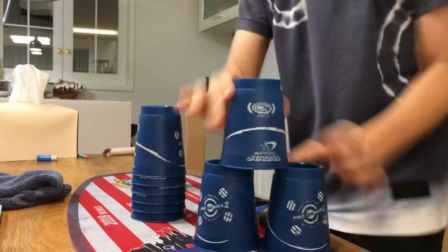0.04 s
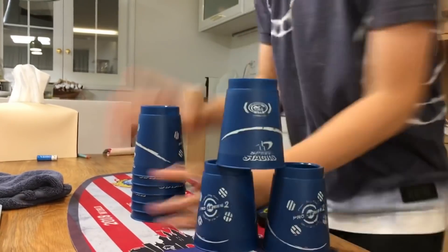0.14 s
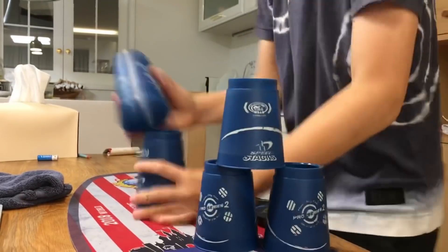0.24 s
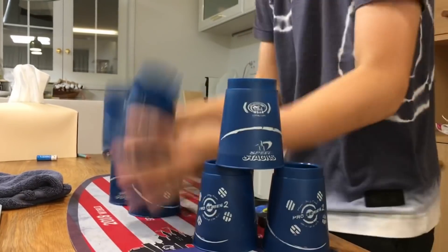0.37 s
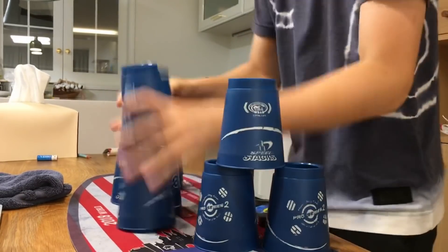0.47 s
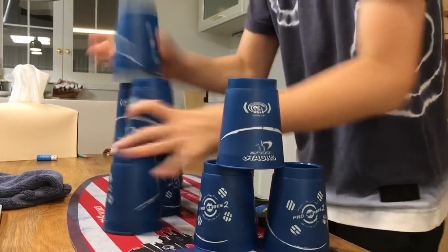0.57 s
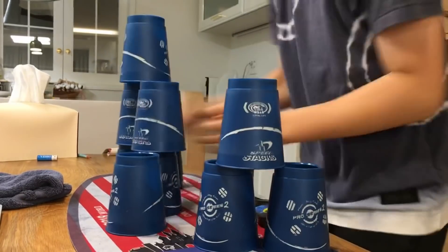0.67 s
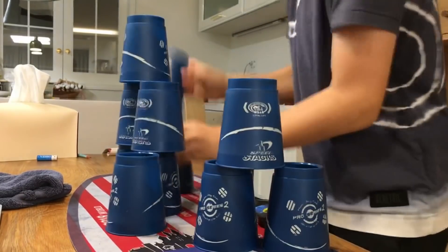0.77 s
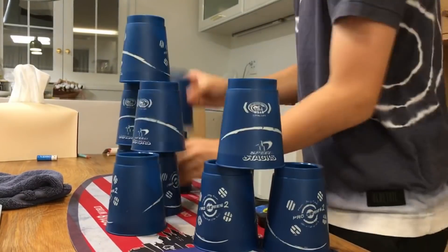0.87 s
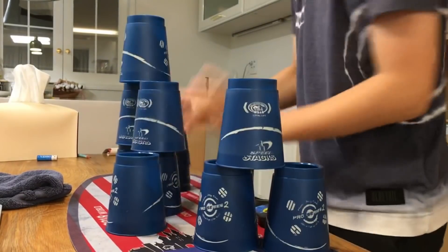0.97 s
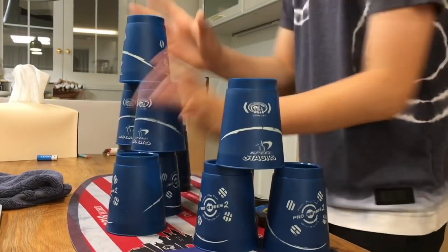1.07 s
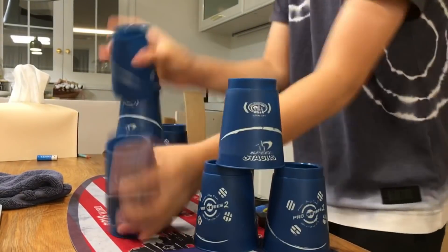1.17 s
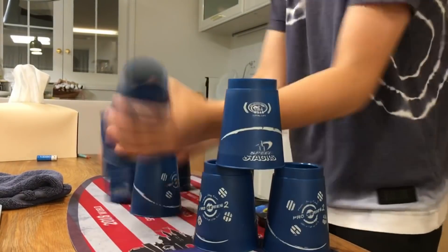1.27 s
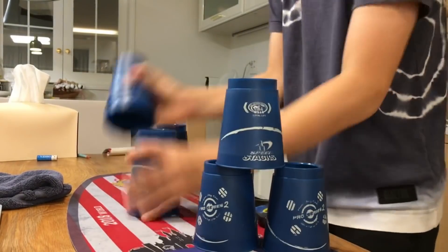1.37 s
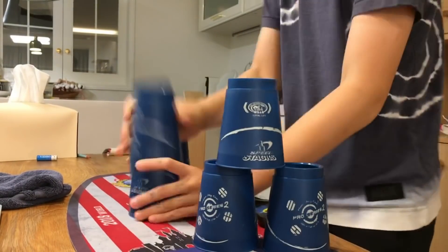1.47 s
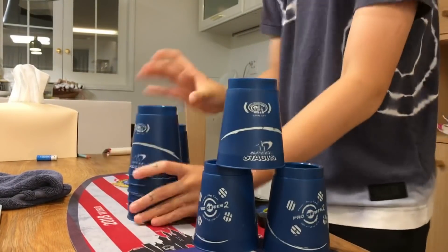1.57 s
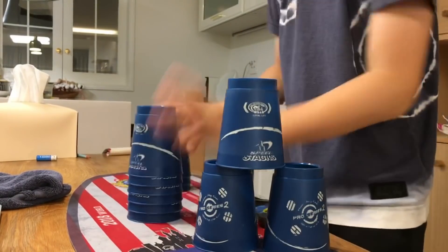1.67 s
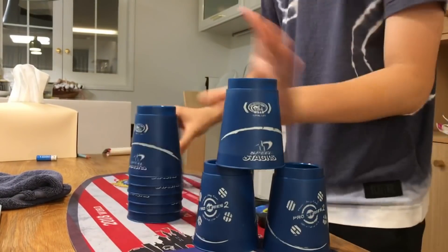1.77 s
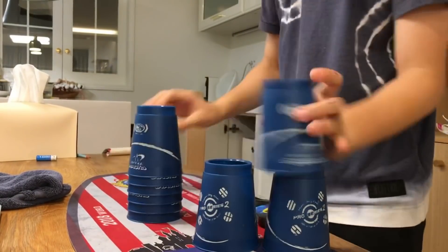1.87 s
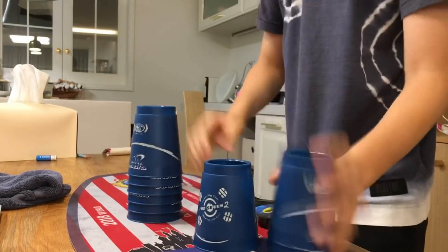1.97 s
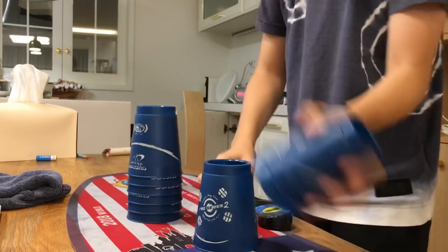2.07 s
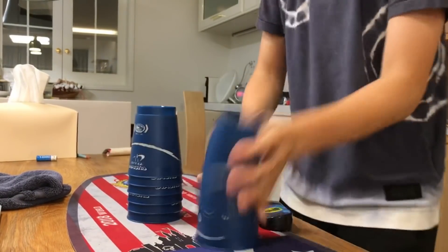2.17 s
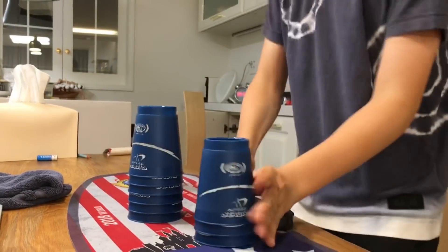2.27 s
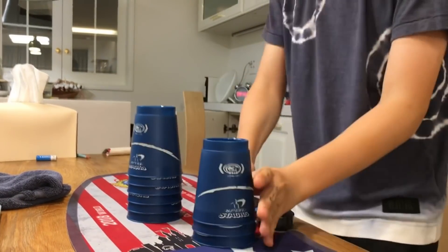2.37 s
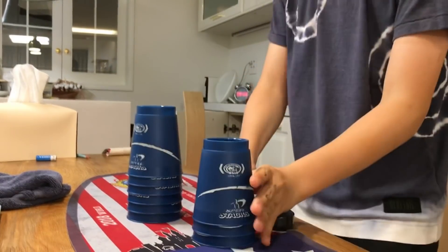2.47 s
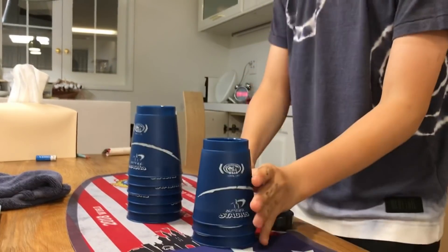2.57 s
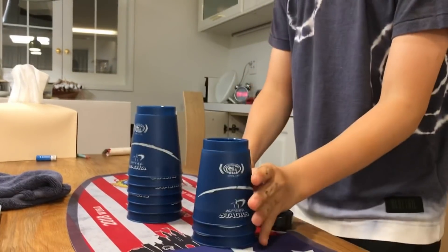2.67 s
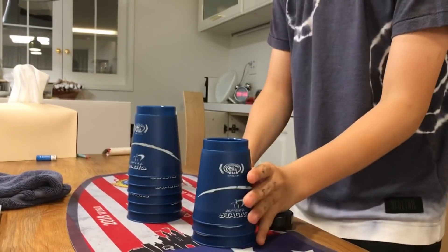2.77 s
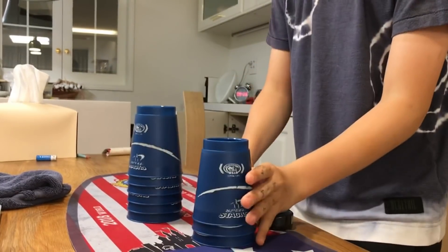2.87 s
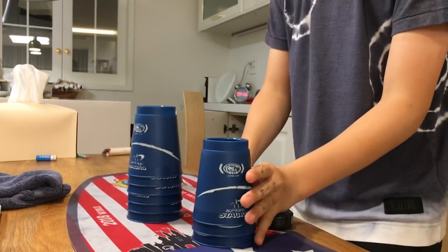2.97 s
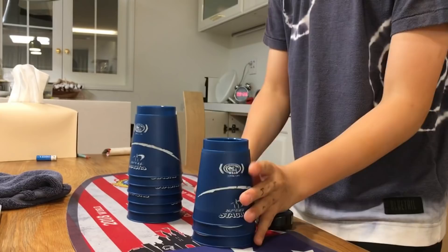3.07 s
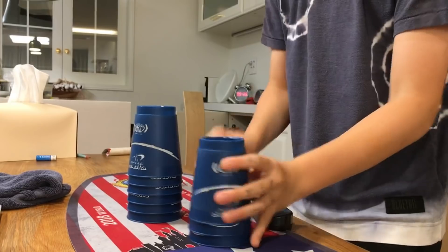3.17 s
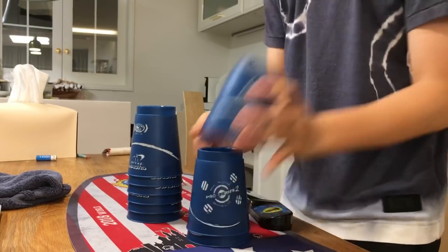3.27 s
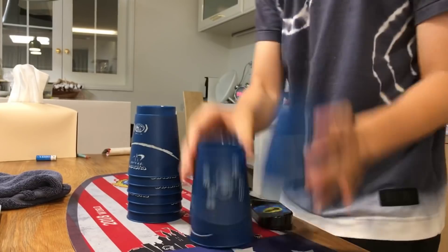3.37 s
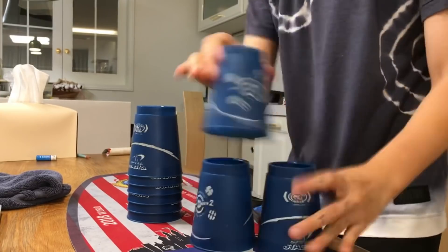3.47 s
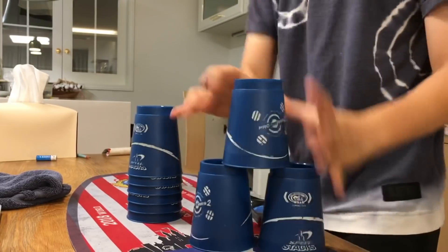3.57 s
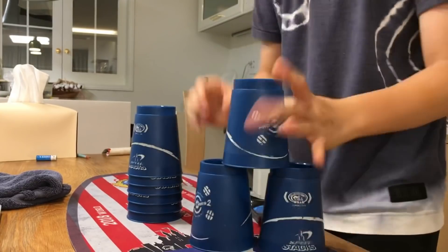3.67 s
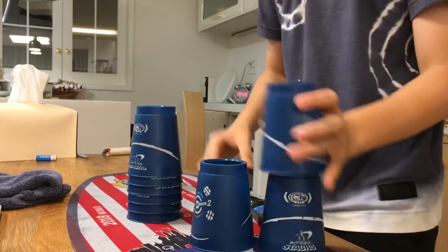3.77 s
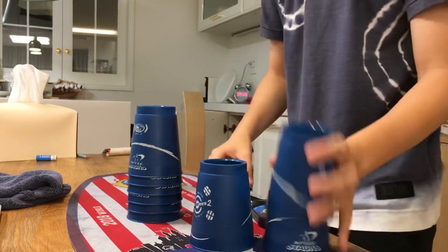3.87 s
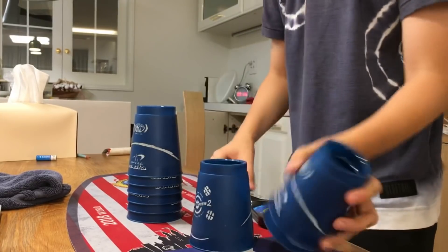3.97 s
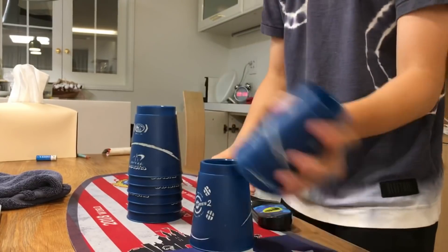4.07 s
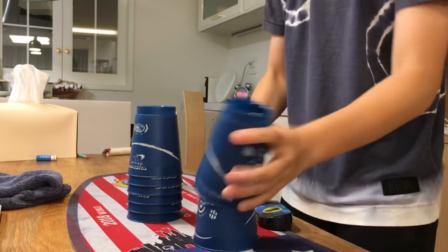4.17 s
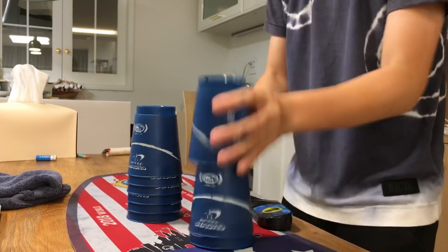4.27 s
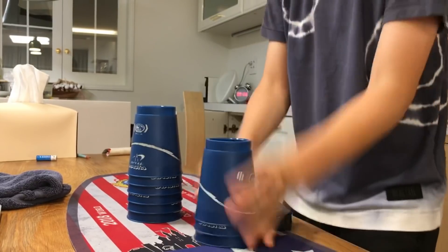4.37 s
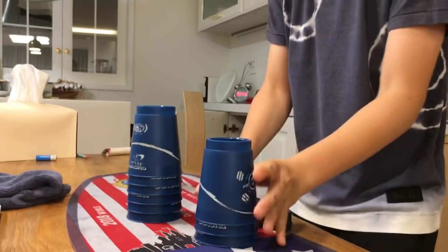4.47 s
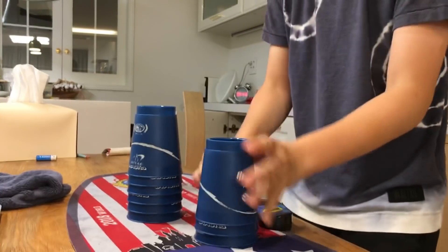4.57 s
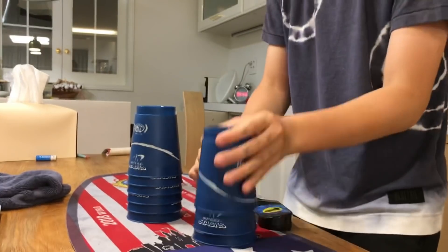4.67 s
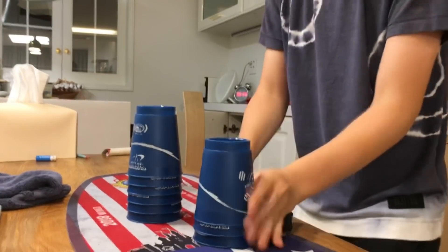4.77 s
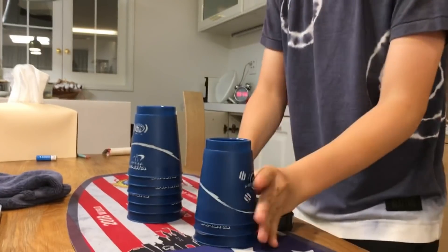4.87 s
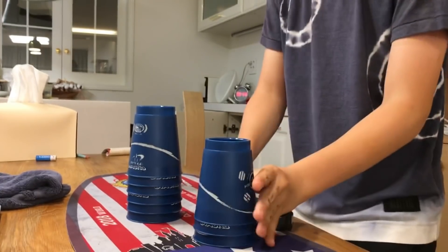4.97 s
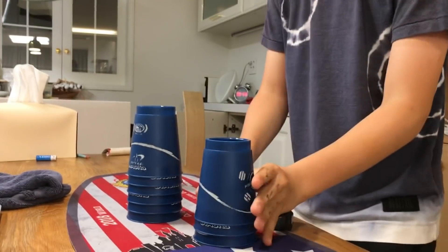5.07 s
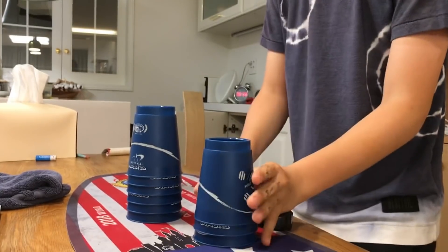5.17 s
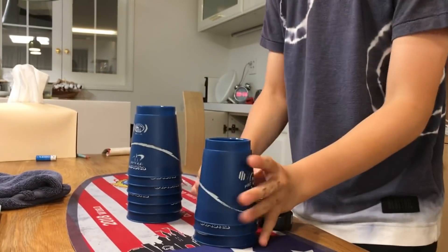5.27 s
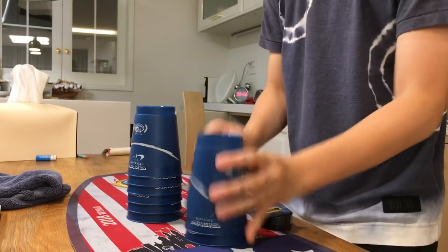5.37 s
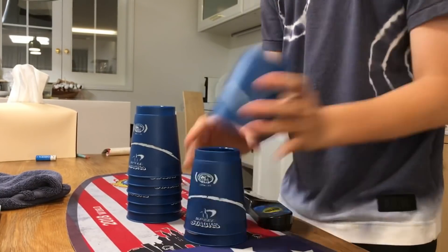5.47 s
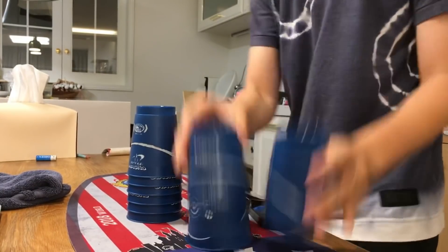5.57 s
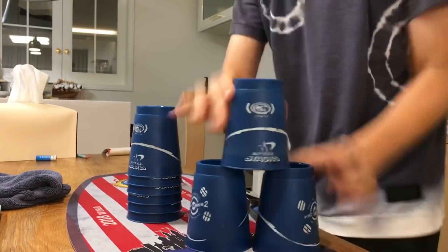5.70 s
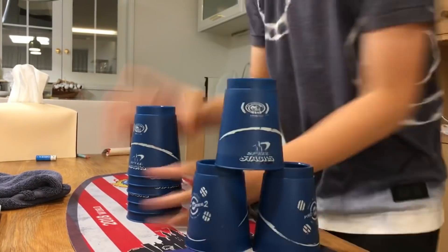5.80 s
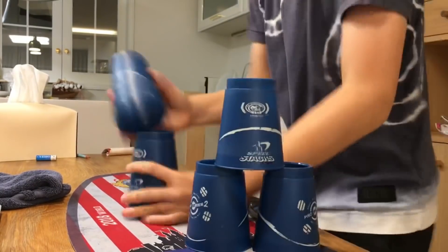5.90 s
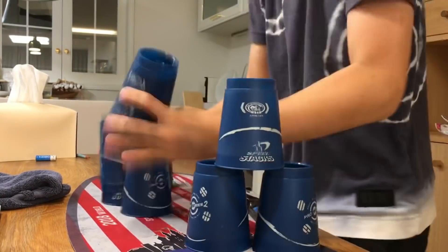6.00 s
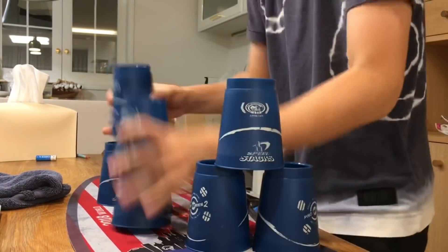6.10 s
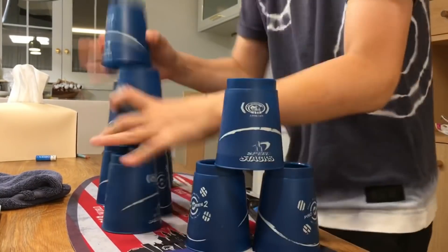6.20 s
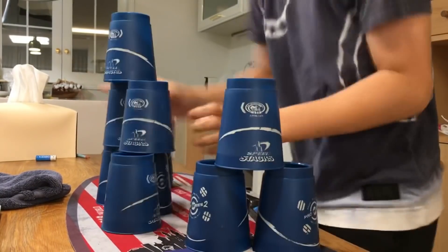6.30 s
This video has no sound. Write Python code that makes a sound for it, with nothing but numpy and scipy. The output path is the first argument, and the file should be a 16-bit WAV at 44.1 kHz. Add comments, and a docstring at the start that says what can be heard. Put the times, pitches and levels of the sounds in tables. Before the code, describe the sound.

Plastic cups are stacked and unstacked very fast on a cloth-covered table, hollow clacks in bursts, with scrapes, low table thuds and short pauses.

```python
"""Fast cup stacking on a kitchen table

Plastic cups are stacked fast on a cloth mat over a wooden table, close to a phone. Each knock is a cluster of
tiny bounces through wall, rim and edge resonators, plus decaying tones for the air inside the cup.
Hands and stacks thump the table, whose low tones swell and boom late; cups slide in between as grainy filtered
noise. A banded noise tail answers as the room, over a quiet shaped-noise hum with one brief faint tone.
"""
import sys
import numpy as np
from scipy import signal
from scipy.fft import rfft, irfft, next_fast_len
from scipy.io import wavfile
from scipy.ndimage import uniform_filter1d

SR = 44100
rng = np.random.default_rng(int(sys.argv[2]) if len(sys.argv) > 2 else 0)


def bounce(signal):
    """Save signal as a 16-bit WAV file at the path given by the first command-line argument."""
    frames = np.transpose(np.atleast_2d(signal))
    limited = np.clip(frames, -1, 1)
    pcm = np.round(limited * 32767).astype(np.int16)
    wavfile.write(sys.argv[1], SR, pcm)


N = 279594  # length in samples

# low modes of the plastic wall: (f/Hz, width/Hz, level/dB)
WALL_MODES = [(885, 200, -1.5), (1211, 312, 4.5), (1336, 510, 2), (2064, 640, -7)]
# high modes of the rim: (f/Hz, width/Hz, level/dB)
RIM_MODES = [(2242, 400, -3), (3264, 380, 0), (4280, 700, -3), (5200, 860, -1), (6627, 3100, -5.5)]
# bright modes of the hard edge contact: (f/Hz, width/Hz, level/dB)
EDGE_MODES = [(9120, 1100, -2.5), (12100, 430, 1.5), (14780, 10000, -9.5)]
# dull give of the cloth mat: (f/Hz, width/Hz, level/dB)
MAT_MODES = [(247, 115, 5), (204, 130, -9.5)]


def knocks():
    """A sharp crack where plastic meets plastic; the rim lands unevenly and shakes walls, mat and the hollow."""
    # cup knocks, and a few renewed swells of a hollow that is still ringing:
    # (t/s, crack level/dB, wall level/dB, hollow level/dB, mat level/dB, crack f/Hz, wall f/Hz, hollow f/Hz)
    hits = [(0.0205, -30.5, -44, -29, -29.5, 2290, 986, 460), (0.036, -37, -36, -26, -50, 2240, 910, 437),
            (0.103, -51, -37, -25.5, -48, 3420, 936, 540), (0.1237, -5, -3.5, 3, -54, 4800, 1163, 639),
            (0.2736, -24, -25, -23, -25.5, 7100, 940, 445), (0.3145, -35, -37, -29, -33, 6030, 1157, 640),
            (0.3364, -23, -20, -29, -25, 2450, 1160, 586), (0.4318, -21, -8.5, -8, -12.5, 2250, 1047, 800),
            (0.441, -30.5, -17, -10, -23, 2300, 1000, 480), (0.467, -45, -33, -22, -43, 2300, 1059, 400),
            (0.4956, -29.5, -24.5, -33, -45, 3620, 970, 620),
            (0.525, -38, -12, -10.5, -15.5, 2360, 1400, 601),
            (0.5306, -10.5, -17, -15, -39, 5600, 1070, 860),
            (0.5951, -34.5, -27, -20, -35, 6160, 1030, 880), (0.62, -28, -22, -22, -31, 3240, 1100, 705),
            (0.6363, -24.5, -40, -20.5, -38, 6400, 915, 610),
            (0.6595, -24, -15, -16.5, -46, 3300, 1220, 650), (0.6815, -3.5, -2.5, 2, -17, 5660, 1244, 607),
            (0.693, -18, -12, -3.5, -24, 5660, 1280, 597.5), (0.7225, -21, -24, -7, -36, 3300, 1200, 607),
            (0.847, -30, -27, -35, -35, 6460, 1210, 435),
            (0.8616, -16.5, -15.5, -33.5, -34.5, 3900, 2080, 860),
            (0.9254, -52, -42, -16, -43, 4220, 930, 484), (0.9411, -8, -7.5, -13.5, -24, 2250, 2060, 453),
            (1.118, -24.5, -17.5, -26.5, -53, 3200, 1230, 614),
            (1.1842, -28, -23, -25, -41, 5440, 1130, 373),
            (1.1996, -26, -19, -15.5, -29.5, 6640, 1060, 610),
            (1.2319, -12.5, -27, -19, -32, 3360, 920, 612),
            (1.2485, -8.5, -15.5, -19, -25, 7440, 1250, 590), (1.257, -15.5, -20, -19, -24, 3140, 920, 610),
            (1.261, -15.5, -19, -9, -24, 2310, 1570, 686), (1.284, -2, -10, -17.5, -20.5, 3870, 980, 580),
            (1.3448, -8.5, -15, -44.5, -41.5, 3440, 1258, 684),
            (1.382, -17.5, -25.5, -30, -44, 3050, 1407, 568), (1.395, -8.5, -9, -9.5, -19, 3400, 972, 767),
            (1.4221, -8, -13, -16.5, -16.5, 2270, 1142, 495),
            (1.4717, -8.5, -12.5, -16.5, -13.5, 3040, 1880, 750),
            (1.535, -14, -27.5, -35.5, -34.5, 3550, 1890, 420),
            (1.5803, -26.5, -23.5, -30.5, -27.5, 2300, 946, 420),
            (1.596, -7.5, -7.5, -20.5, -12.5, 2240, 1244, 396),
            (1.6056, -4.5, -20.5, -16.5, -39, 2200, 917, 593),
            (1.7925, -53.5, -43, -33.5, -43, 2300, 950, 517),
            (1.9094, -43, -43, -30.5, -47.5, 5390, 1028, 670),
            (1.9253, -27.5, -26, -20.5, -41, 5500, 1078, 694),
            (1.9761, -36, -41, -34.5, -54.5, 5100, 1280, 704),
            (1.9983, -18.5, -31, -40, -47, 5660, 1250, 710),
            (2.034, -31.5, -48, -37.5, -57, 3400, 1000, 630),
            (2.055, -19, -28, -29, -48.5, 3200, 1870, 630),
            (2.0739, -11.5, -13, -15.5, -31.5, 2940, 1676, 632),
            (2.0823, -6.5, -6, -7.5, -23.5, 3500, 1474, 890),
            (2.235, -14, -22.5, -16, -30.5, 2530, 1250, 623),
            (2.245, -21, -32, -24, -32.5, 2700, 1080, 520), (2.255, -15.5, -24, -32, -34, 6770, 1034, 620),
            (2.265, -35, -33.5, -16, -23.5, 3300, 1020, 616), (2.2988, -6, -7.5, -1, -5, 3050, 1247, 671),
            (2.5796, -45, -34.5, -52, -49.5, 3110, 1200, 377),
            (2.5975, -44, -34, -44, -59.5, 2440, 1028, 431), (3.186, -51.5, -52, -57, -68, 2300, 940, 678),
            (3.233, -46, -48, -68, -61, 2390, 1240, 670), (3.3054, -34.5, -29.5, -36, -46, 2960, 1690, 585),
            (3.3208, -45, -40.5, -47, -48, 3100, 1636, 586),
            (3.438, -47, -53, -53.5, -49.5, 6000, 948, 700),
            (3.4513, -45.5, -34, -39.5, -46, 4050, 1165, 790),
            (3.4968, -27, -59, -64, -42.5, 4100, 1980, 450), (3.523, -31, -65, -44, -40, 6200, 920, 378),
            (3.5416, -34, -51, -30.5, -25.5, 2920, 1190, 452),
            (3.5557, -24.5, -46, -32.5, -31.5, 5900, 920, 710),
            (3.6135, -7, -8, -2.5, -40, 5400, 1200, 655), (3.6196, -19, -17.5, -9.5, -26, 5430, 1150, 734),
            (3.8028, -42, -51.5, -34, -44.5, 5650, 915, 660),
            (3.817, -42.5, -43.5, -35, -56, 5460, 1180, 632), (3.9235, -31, -40, -45, -58, 3500, 1860, 616),
            (3.968, -31, -50.5, -45.5, -49, 4600, 1060, 606),
            (3.984, -30, -54.5, -34.5, -43, 3150, 1730, 705),
            (4.0318, -7.5, -19, -37, -32, 2260, 1265, 894),
            (4.227, -18, -27.5, -18, -34.5, 5180, 1210, 596), (4.252, -28, -48, -41, -36, 6270, 1190, 430),
            (4.2655, -23.5, -38, -30.5, -46.5, 6000, 1220, 500),
            (4.2716, -12.5, -16, -19.5, -33.5, 2560, 1230, 448),
            (4.3368, -28, -32, -31, -45.5, 4360, 1190, 520), (4.3794, -7, -14, -22, -40.5, 3180, 1350, 732),
            (4.4276, -35, -28, -31, -45.5, 3410, 964, 656),
            (4.4524, -26, -29, -36.5, -47.5, 4160, 1354, 555),
            (4.4669, -5.5, -6.5, -7, -20, 3270, 1794, 579),
            (4.7189, -38.5, -38, -32.5, -53, 3080, 1150, 660),
            (4.7497, -42.5, -34.5, -36.5, -56.5, 3230, 933, 710),
            (4.824, -37.5, -33.5, -34.5, -40.5, 3050, 1564, 578),
            (4.8399, -6, -8.5, -8.5, -27, 2200, 1180, 631), (4.8658, -22.5, -29, -14, -27, 3000, 910, 698),
            (4.8872, -32, -28.5, -22, -22, 2680, 1250, 427),
            (4.9061, -25.5, -18.5, -24.5, -42, 3200, 1500, 627),
            (5.4202, -41.5, -48, -58, -54.5, 2476, 1530, 392), (5.4856, -37, -59, -49, -39, 3110, 904, 577),
            (5.516, -44.5, -40.5, -45, -55, 3270, 1330, 580), (5.6064, -46, -45, -37, -38, 2300, 1490, 703),
            (5.6376, -41, -43.5, -50.5, -55, 6160, 1760, 736),
            (5.7206, -36.5, -38.5, -24.5, -48, 2260, 910, 534),
            (5.7372, -21.5, -37, -26.5, -33, 5080, 920, 684),
            (5.745, -27, -38, -27.5, -39, 2300, 2200, 655), (5.7597, -32, -42, -34, -45, 3140, 1830, 495),
            (5.7951, -4.5, -5.5, 0.5, -23, 5530, 1194, 671), (5.896, -50, -36, -30, -48, 3300, 1190, 692),
            (5.9464, -32.5, -30.5, -31.5, -30, 2300, 975, 512),
            (6.0095, -13.5, -18.5, -32.5, -27, 2310, 1150, 590),
            (6.106, -13.5, -5.5, -4.5, -12, 2290, 1030, 797), (6.1304, -25, -19, -15, -28, 2620, 870, 673),
            (6.1872, -34, -10, -11, -23, 2300, 1390, 584), (6.196, -8, -17, -24.5, -17, 3390, 1080, 492),
            (6.2395, -27.5, -23, -14.5, -34, 3360, 920, 702), (6.28, -41, -40, -25, -41, 6000, 970, 620),
            (6.303, -30.5, -24, -21, -34, 5740, 1140, 730)]
    # modes of the air in the cup: (pitch ratio, level/dB, t60 ratio)
    hollow_modes = [(.64, -8.5, 0.73), (1, 6.5, 0.65), (1.07, -8, 1.3), (1.13, -0.5, 0.69)]
    # a flat landing traps air: the more the hollow outweighs the crack, the longer and duller the contact
    crack_s, crack_doubles_db = .0024, 15.5  # length at equal levels; hollow over crack that doubles it
    landing_s, landing_doubles_db = .0042, 30.5  # the same for the landing
    edge_below_crack_db, edge_dulling = -4, 0.26  # edge dB lost for each dB of hollow over crack
    edge_share = .6  # the hard edge bounces for this share of the crack's length
    # ring time of the hollow at a reference pitch; a higher hollow dies sooner by this power
    hollow_t60_s, hollow_ref_hz, hollow_shortens = 0.055, 620, 0.48

    out, t = np.zeros(N), np.arange(6000) / SR
    chance = rng.random((len(hits), 3, 4))
    spots = rng.standard_normal((len(hits), 2, len(RIM_MODES)))
    for hit, (quick, slow, phases), (rim_spot, edge_spot) in zip(hits, chance, spots):
        start, crack_db, wall_db, hollow_db, mat_db, crack_hz, wall_hz, hollow_hz = hit
        flat_db = np.clip(hollow_db - crack_db, -20, 12)
        crack_length = crack_s * 2 ** (flat_db / crack_doubles_db)
        landing_length = landing_s * 2 ** (flat_db / landing_doubles_db)
        edge_db = crack_db + edge_below_crack_db - edge_dulling * max(flat_db, 0)
        t60 = hollow_t60_s * (hollow_ref_hz / hollow_hz) ** hollow_shortens

        # edge and rim share one set of random lags, walls and mat another
        tick = chatter(edge_share * crack_length, quick)
        snap = chatter(crack_length, quick)
        push = chatter(landing_length, slow)

        # the spot that is struck favours one high and one low wall mode
        crack = favour(body(snap, struck(RIM_MODES, rim_spot)), crack_hz, 500, 5.5)
        edge = body(tick, struck(EDGE_MODES, edge_spot))
        wall = favour(body(push, WALL_MODES), wall_hz, 160, 6.4)
        mat = body(push, MAT_MODES)
        hollow = ring(hollow_modes, hollow_hz, t60, 0.52 * landing_length, phases, t)

        add(out, start, peak(crack, crack_db) + peak(edge, edge_db))
        add(out, start, peak(wall, wall_db) + peak(mat, mat_db))
        add(out, start, peak(hollow, hollow_db))
    return out


def thumps():
    """A soft push builds up the low modes of the table top over a cycle or two and shakes the mat."""
    # thumps on the table: (t/s, level/dB, f/Hz)
    blows = [(0.27, -32, 144), (0.679, -48, 91.5), (0.942, -30.5, 120), (1.391, -29.5, 152.5),
             (1.59, -31, 158), (1.784, -37.5, 108), (2.093, -24, 121), (2.331, -10, 95.6),
             (3.252, -33, 108.2), (3.446, -43.5, 79.4), (3.533, -41, 111), (3.619, -32.5, 150),
             (4.5, -15.5, 93.8), (4.649, -33.5, 90), (4.878, -2, 103.6), (4.968, -26, 100),
             (5.456, -39, 103.3), (5.606, -46, 93), (5.724, -38.5, 171), (5.943, -39, 105),
             (6.101, -27.5, 126)]
    # modes of the table top: (pitch ratio, level/dB, t60 ratio)
    table_modes = [(.62, -4, 0.42), (1, 3, 0.47), (1.3, -15.5, 1), (2.0, -18, 0.34), (3.1, -26, 0.99)]
    swell_s = .024
    loud_t60_s, doubles_db = 0.41, 75  # ring of a 0 dB thump; softer ones die sooner

    out, t = np.zeros(N), np.arange(20000) / SR
    turns = rng.random((len(blows), len(table_modes)))
    shakes = rng.standard_normal((len(blows), len(t)))
    for (time, db, hz), phases, noise in zip(blows, turns, shakes):
        t60 = loud_t60_s * 2 ** (db / doubles_db)
        boom = ring(table_modes, hz, t60, swell_s, phases, t)
        mat = body(noise, MAT_MODES + [(408, 130, -10.5)]) * t * np.exp(-t / swell_s)
        # start early, so that the swell is a little over half full at the listed time
        add(out, time - .9 * swell_s, peak(boom, db) + peak(mat, db - 13.5))
    return out


def handling():
    """Cups scrape over each other in grains, their hollows murmur, the table rumbles under the hands."""
    # handling levels: (t/s, scrape level/dB, murmur of the hollows level/dB, table rumble level/dB)
    moves = [(0.0, -71, -56, -47.5), (0.3, -46.5, -47, -45.5), (0.55, -50, -36.5, -41.5),
             (0.83, -44.5, -54.5, -50), (0.941, -38, -27.5, -69), (1.2, -52.5, -53, -44),
             (1.3, -30.5, -29.5, -45.5), (1.48, -33, -31, -32.5), (1.75, -59, -51, -54),
             (2.21, -59, -65.5, -41), (2.33, -33.5, -30.5, -30.5), (2.471, -56.5, -52, -45.5),
             (2.84, -74.5, -68.5, -72), (3.5, -67.5, -65.5, -55), (3.89, -63, -61.5, -62.5),
             (4.04, -50, -53, -46.5), (4.25, -69, -69, -67.5), (4.5, -35, -33.5, -44),
             (4.66, -60.5, -60, -44), (4.85, -62.5, -62, -66.5), (5.5, -70, -65.5, -64),
             (5.88, -58, -62, -48), (5.97, -47, -45, -44), (6.34, -46, -35, -54)]
    times, *columns = np.transpose(moves)
    slide_db, murmur_db, rumble_db = (np.interp(np.arange(N) / SR, times, c) for c in columns)

    # noise with a flickering level: fast for the scrape, slower for the murmur, slowest for the rumble
    flicker_db = [3.5 * walk(200), 3 * walk(60), 3 * walk(25)]
    scrape_grains, murmur_grains, rumble_grains = rng.standard_normal((3, N)) * undb(flicker_db)

    slide = unit(unit(body(scrape_grains, RIM_MODES)) + 0.34 * unit(body(scrape_grains, EDGE_MODES)))
    hollows = body(murmur_grains, [(430, 200, -3.0), (655, 160, 0.5)])
    murmur = unit(hollows + .5 * body(murmur_grains, WALL_MODES))
    rumble = unit(body(rumble_grains, [(53, 45, -8.5), (100, 23, -1.0), (157, 90, -6.0)]))
    return slide * undb(slide_db) + murmur * undb(murmur_db) + rumble * undb(rumble_db)


def room(x):
    """Diffuse noise tail that builds up within milliseconds and dies at its own rate in each band."""
    # reverb bands: (f/Hz, t60/s, level/dB)
    bands = [(148, .45, -21.5), (410, 0.22, -2.5), (866, 0.58, -12.5), (1700, 0.28, -7), (3300, 0.17, -6),
             (6400, .36, -10), (10900, 0.19, -10), (14900, 0.35, -17)]
    t = np.arange(int(.8 * SR)) / SR
    tail = 0
    for hz, t60, db in bands:
        mode = [(hz, 1.1 * hz, 0)]
        band = body(body(rng.standard_normal(len(t)), mode), mode)  # filtered twice for steeper sides
        fade = undb(-60 * t / t60) * np.clip(t / 0.0041, 0, 1)
        tail = tail + band * fade * undb(db) / np.sqrt(np.sum(fade ** 2))
    return signal.fftconvolve(x, tail)[:N]


def air():
    """Steady household hum and hiss: shaped noise, swelling a little, with one brief faint tone."""
    # relative spectrum of the hum and hiss: (f/Hz, level/dB per Hz)
    spectrum = [(25, -18.5), (57, -7), (70, -12), (88, -29), (165, -19), (470, -35), (1100, -32),
                (1650, -38.5), (2100, -28.5), (2450, -44.5), (4000, -42.5), (4900, -54.5), (5900, -40.5),
                (7000, -51), (16000, -59)]
    # brief faint tone: (t/s, half length/s, f/Hz, level/dB)
    squeak = (5.32, .035, 2130, -59)
    hum_db = -57.5  # rms before the swelling

    size = next_fast_len(N)
    hz, db = np.transpose(spectrum)
    bins_hz = np.arange(size // 2 + 1) * SR / size
    shape = undb(np.interp(np.log(bins_hz + 1), np.log(hz), db))
    noise = irfft(rfft(rng.standard_normal(size)) * shape, size)[:N]
    hum = unit(noise) * undb(hum_db + 1.3 * walk(6))

    middle, half, tone_hz, tone_db = squeak
    t = np.arange(N) / SR
    tone = np.sin(2 * np.pi * tone_hz * t) * np.exp(-((t - middle) / half) ** 2)
    return hum + undb(tone_db) * tone


def chatter(length, chance):
    """One impact scattered into a cluster of bounces: all-pass echoes keep its spectrum flat."""
    at_once = .8  # share of the impact that each echo stage passes without delay
    turn = -2j * np.pi * np.arange(2049) / 4096  # phase of a one-sample delay
    spectrum = np.ones(2049)
    for lag in length * SR * (.03 + .35 * chance ** 2):
        echo = np.exp(turn * max(round(lag), 1))
        spectrum = spectrum * (at_once - echo) / (1 - at_once * echo)
    return irfft(spectrum)


def ring(modes, hz, t60, swell, phases, t):
    """Modes around a pitch that swell while the contact lasts and then die away."""
    tones = 0
    for (ratio, db, longer), phase in zip(modes, phases):
        fade = undb(db - 60 * t / (max(t60, .01) * longer))
        tones = tones + fade * np.sin(2 * np.pi * (ratio * hz * t + 0.37 * phase))
    return tones * (1 - np.exp(-(t / max(swell, .0003)) ** 2))


def body(x, modes):
    """Sum of resonators (f/Hz, width/Hz, level/dB) with alternating sign."""
    total = 0
    for k, (hz, width, db) in enumerate(modes):
        b, a = signal.iirpeak(hz, hz / width, SR)
        total = total + (-1) ** k * undb(db) * signal.lfilter(b, a, x)
    return total


def favour(x, hz, width, db):
    """Lift one mode over its neighbours."""
    return x + body(x, [(hz, width, db)])


def struck(modes, chance):
    """The same modes, each excited more or less by where the blow falls."""
    spot_db = 2.5  # spread of each mode from knock to knock
    return [(hz, width, db + spot_db * c) for (hz, width, db), c in zip(modes, chance)]


def walk(rate):
    """Random levels, drawn at a rate in Hz and joined by straight slopes; spread near 1."""
    k = int(SR / rate)
    steps = np.repeat(rng.standard_normal(N // k + 1), k)
    return uniform_filter1d(steps, k)[:N]


def undb(db):
    """Decibels to an amplitude factor."""
    return 10 ** (np.asarray(db) / 20)


def unit(x):
    """Scale to rms 1."""
    return x / np.sqrt(np.mean(x ** 2))


def peak(x, db):
    """Scale to a peak level in dB."""
    return x * undb(db) / np.abs(x).max()


def add(out, start, x):
    """Mix x in at a time in seconds."""
    i = int(start * SR)
    out[i:i + len(x)] += x[:max(N - i, 0)]


def scene():
    """Knocks and thumps excite the room; handling and household air are mixed in dry."""
    cups = knocks() + thumps()
    return (cups + room(cups) + handling() + air())[None]


def record(dry):
    """The phone loses the deepest bass, flattens the loudest peaks and cuts the top."""
    top_hz = 16000
    thin = signal.sosfilt(signal.butter(2, 35, "high", fs=SR, output="sos"), dry)
    flat = thin / (1 + (thin / .95) ** 4) ** .25
    return signal.sosfilt(signal.ellip(10, .2, 80, top_hz, fs=SR, output="sos"), flat)


dry = scene()
out = record(dry)
bounce(out)
```